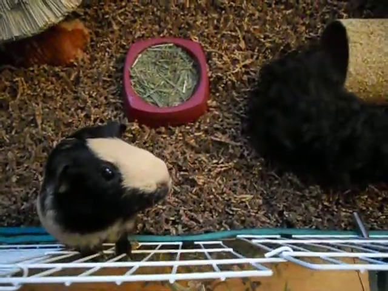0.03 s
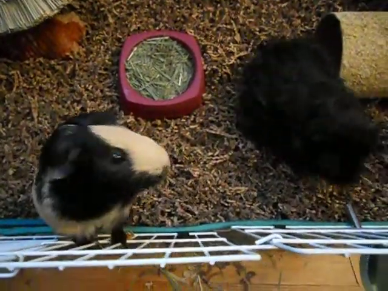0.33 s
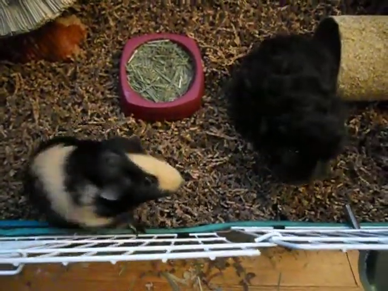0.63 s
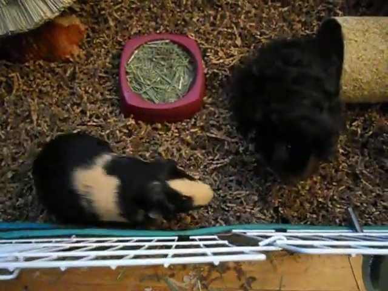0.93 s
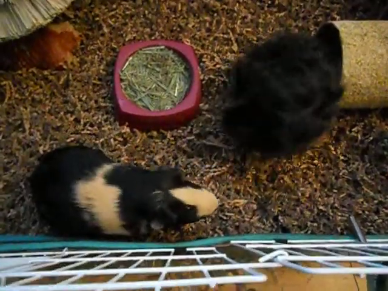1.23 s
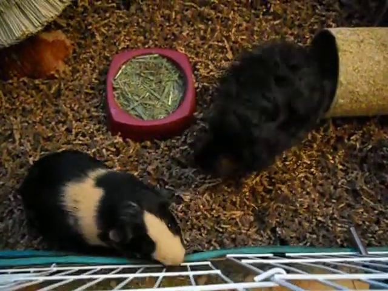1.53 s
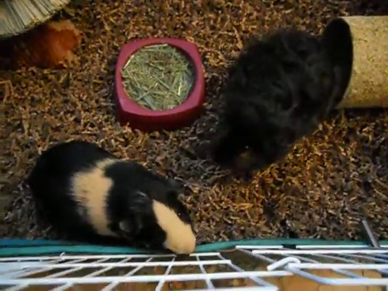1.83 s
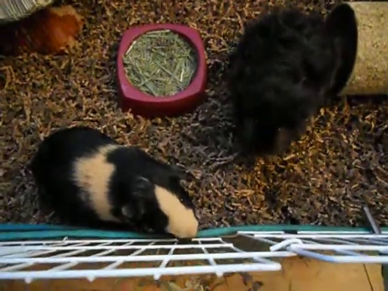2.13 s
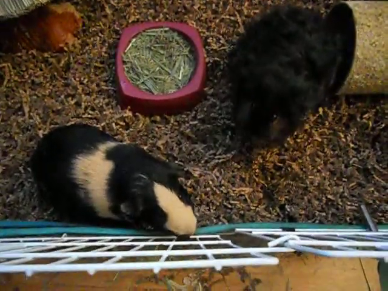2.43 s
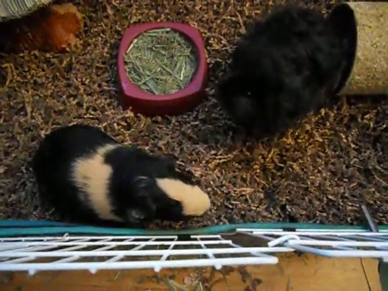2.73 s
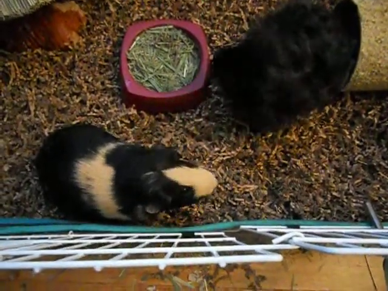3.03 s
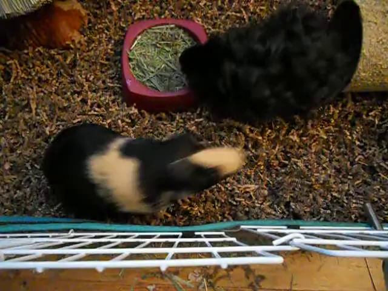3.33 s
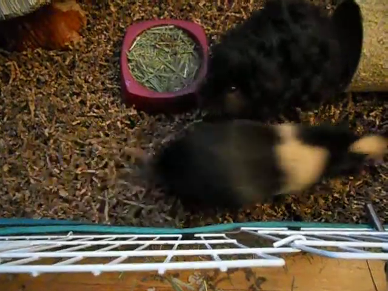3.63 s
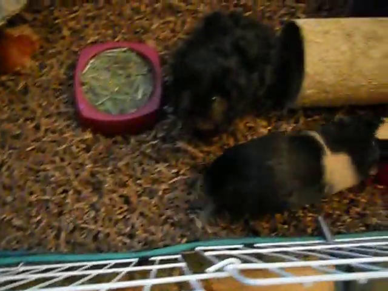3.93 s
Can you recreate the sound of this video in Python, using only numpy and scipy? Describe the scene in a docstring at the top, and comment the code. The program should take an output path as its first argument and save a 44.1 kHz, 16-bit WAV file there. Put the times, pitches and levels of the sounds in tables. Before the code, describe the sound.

Guinea pigs call close by over steady room hiss. Short rising clucks repeat from 0.2 to 2.9 seconds, with a soft whimper near 0.4 and light bedding rustles. Hoarse grunts come around 1.3, 2.5 and 2.9 seconds. Scattered hard ticks surround one sharp snap just before 3 seconds. From 3.2 to 4 seconds, two louder, wavering squeals climb in pitch as feet scuffle through dry, crackling bedding.

```python
"""Guinea pigs in an indoor cage

Heard from close above, they give short rising clucks, some sinking into a hoarse grunt, and end
on two wavering squeals, all from vocal folds sounding through the throat. Their feet shuffle through
dry, crackling bedding, with a few hard ticks and one sharp snap, over a steady room hiss."""
import sys
import numpy as np
from scipy import signal
from scipy.fft import rfft, irfft
from scipy.io import wavfile
from scipy.ndimage import uniform_filter1d

SR = 44100
rng = np.random.default_rng(int(sys.argv[2]) if len(sys.argv) > 2 else 0)


def bounce(signal):
    """Save signal as a 16-bit WAV file at the path given by the first command-line argument."""
    frames = np.transpose(np.atleast_2d(signal))
    limited = np.clip(frames, -1, 1)
    pcm = np.round(limited * 32767).astype(np.int16)
    wavfile.write(sys.argv[1], SR, pcm)


N = 176400
T = np.arange(N) / SR
HZ = np.fft.rfftfreq(N, 1 / SR)


def amp(db):
    """Decibels to gain."""
    return 10 ** (np.asarray(db) / 20)


def unit(x):
    """Scales to rms 1."""
    return x / np.sqrt(np.mean(x ** 2) + 1e-20)


def eq_db(points, hz):
    """Reads an EQ curve on a log-frequency axis."""
    f, db = np.transpose(points)
    return np.interp(np.log(hz + 1), np.log(f + 1), db)


def colour(x, points):
    """Plays x through an EQ curve, at rms 1."""
    return unit(irfft(rfft(x) * amp(eq_db(points, HZ)), N))


def wander(rate_hz):
    """Random drift up to a rate, at rms 1."""
    return unit(irfft(rfft(rng.standard_normal(N)) / (1 + (HZ / rate_hz) ** 4), N))


def add(mix, start, sound):
    """Mixes a sound in at a start in seconds."""
    part = mix[round(start * SR):][:len(sound)]
    part += sound[:len(part)]


# The colour of the room tone. Each row: frequency in Hz, relative level in dB.
ROOM_EQ = [(15, -38), (25, 2.5), (235, -5), (295, 0), (335, -2.5), (442, -3.5), (1040, -5), (2450, -9.5),
           (10300, -15), (13400, -37), (22000, -120)]
# Its fader. Each row: time in seconds, level in dB.
ROOM_FADER = [(0, -45.5), (.2, -46.5), (.8, -43), (2.1, -42.5), (4, -40)]

def room_tone():
    """A bed of hiss and rumble that creeps up a few dB."""
    return colour(rng.standard_normal(N), ROOM_EQ) * amp(np.interp(T, *np.transpose(ROOM_FADER)))


def room_reverb(x, wet_db=-10, t60_s=0.11):
    """The short, weak reverberation of a furnished room."""
    t = np.arange(SR // 2) / SR
    tail = rng.standard_normal(len(t)) * amp(-60 * t / t60_s) * (t > .003)
    return amp(wet_db) * signal.oaconvolve(x, tail / np.linalg.norm(tail))[:N]


HIT_T = np.arange(2048) / SR
CONTACT_S = 0.00026

def ring(modes, contact_s):
    """Dying sines of a struck object, built up over a brief contact."""
    sines = sum((-1) ** k * amp(db - 60 * HIT_T / t60) * np.sin(2 * np.pi * hz * HIT_T)
                for k, (hz, db, t60) in enumerate(modes))
    return np.minimum(HIT_T / contact_s, 1) * sines


# Feet pushing through the bedding. Each row: middle in seconds, half length in seconds, level in dB.
SCUFFS = [(0.39, 0.13, -48.5), (0.523, 0.024, -37.5), (0.584, 0.02, -35.5), (0.653, 0.03, -39),
          (0.859, 0.029, -38.5), (1.2, 0.11, -45), (1.377, 0.069, -40.5), (3.222, 0.12, -44),
          (3.364, 0.039, -34), (3.44, 0.015, -33), (3.518, 0.035, -32.5), (3.61, 0.027, -33.5),
          (3.763, 0.064, -34.5), (3.87, 0.032, -38), (3.966, 0.045, -43)]
# The dry colour of the flakes. Each row: frequency in Hz, relative level in dB.
BEDDING_EQ = [(100, -26), (400, -16.5), (1200, -9.5), (2500, -11.5), (4200, 3), (5500, -2), (8000, -2),
              (10300, -7), (12000, -16)]

def bedding(stir_db=-57.5, breaks_per_s=7500, spread_db=2.3, clump_db=2.5):
    """Over a faint stir, each scuff crushes dry flakes in clumps, crackling at a dozen pitches."""
    power = amp(stir_db) ** 2 + sum(amp(db) ** 2 * np.exp(-((T - middle) / half) ** 2)
                                    for middle, half, db in SCUFFS)
    flakes_hz = np.linspace(800, 12000, 12)
    crackle = np.zeros(N)
    for hz in flakes_hz:
        sizes = amp(spread_db * np.minimum(rng.exponential(1, N), 4.5)) * rng.choice([-1, 1], N)
        breaks = sizes * (rng.random(N) < breaks_per_s / len(flakes_hz) / SR)
        crackle += signal.oaconvolve(breaks, ring([(hz, 0, .0025)], CONTACT_S))[:N]
    clumps = amp(clump_db * wander(rate_hz=119))
    return np.sqrt(power) * colour(crackle * clumps, BEDDING_EQ)


def crack(t60_s=0.0074):
    """A very short, bright burst as something brittle gives way."""
    bright_noise = unit(np.diff(rng.standard_normal(len(HIT_T) + 1)))
    return bright_noise * np.minimum(HIT_T / CONTACT_S, 1) * amp(-60 * HIT_T / t60_s)


# Small hard ticks and a pop, each a crack and a short ring. Each row: start in seconds, level in dB,
# pitch in Hz, trim in dB on the upper modes and the crack.
TICKS = [(.668, -24.5, 4180, -5), (1.109, -21, 1580, -24), (2.4741, -17.5, 3650, -2.5),
         (2.655, -28.5, 3340, -9), (2.806, -15.5, 3970, -4.5), (2.822, -23.5, 3900, -14),
         (3.107, -26.5, 3640, -2), (3.2, -24, 4300, -11), (3.329, -13.5, 3800, -13), (3.367, -24, 4260, 0),
         (3.454, -32, 4050, 13)]
# The ring of a tick. Each row: pitch ratio, relative level in dB, time to fall 60 dB in seconds.
TICK_MODES = [(1, 1, 0.0076), (1.68, 1, 0.0045), (2.08, -1.5, 0.0058)]

def ticks():
    """Small hard ticks, probably claws and teeth, plus the pop of a cluck's abrupt start at 1.109 s."""
    out = np.zeros(N)
    for start, db, hz, upper_db in TICKS:
        modes = [(hz * ratio, mode_db + upper_db * (k > 0), t60)
                 for k, (ratio, mode_db, t60) in enumerate(TICK_MODES)]
        add(out, start, amp(db) * (ring(modes, 0.00042) + amp(upper_db) * crack()))
    return out


# The ring of the snap. Each row: frequency in Hz, gain in dB, time to fall 60 dB in seconds,
# build-up in seconds.
SNAP_MODES = [(1150, -9, 0.0025, .0004), (1820, -0.5, 0.0035, 0.00059), (2910, 4.5, 0.0084, 0.0027),
              (3810, 2.5, 0.01, 0.0032), (5110, -4.5, 0.0059, 0.0004), (7470, -14, 0.0078, 0.00072)]

def snap(start=2.9358):
    """One loud, brittle crack whose modes swell and die within milliseconds."""
    out = np.zeros(N)
    add(out, start, amp(-13.5) * crack())
    for hz, db, t60, build_s in SNAP_MODES:
        add(out, start, ring([(hz, db, t60)], build_s))
    return out


DRIFT_DEPTH, FLUTTER_DB, OVERTONE_DB_PER_OCT = .007, 2.3, -4
JITTER, SHIMMER, RASP = 0.092, .51, 0.57  # pitch shake, level shake and noise at roughness 1

def voice(start, hz, gain, rough, throat, unrest, tilt_db=0):
    """Vocal folds sound through the throat; rough ones beat unevenly and add a rasp."""
    samples = round(start * SR) + np.arange(len(hz))
    drift, jitter, shimmer, air, *flutter = np.take(unrest, samples, axis=1, mode="wrap")
    phase = 2 * np.pi * np.cumsum(hz * (1 + DRIFT_DEPTH * drift + JITTER * rough * jitter)) / SR
    k = 1 + np.arange(len(flutter))[:, None]  # harmonic numbers
    slope_db = (OVERTONE_DB_PER_OCT + tilt_db) * np.log2(k)
    partials = amp(eq_db(throat, k * hz) + slope_db + FLUTTER_DB * np.array(flutter))
    tone = (partials * np.cos(k * phase + k ** 2)).sum(0) / np.sqrt((partials ** 2).sum(0) / 2)
    shaky_tone = tone * (1 + SHIMMER * rough * shimmer)
    pulsed_air = air * (1 + .5 * np.cos(phase))
    rasp = np.clip(RASP * rough, 0, 1)
    return gain * (np.sqrt(1 - rasp ** 2) * shaky_tone + rasp * pulsed_air)


def follow(curve, fade_s=0.0059):
    """Smooths a call's curve into times, pitch, gain with soft ends, and timbre (its last column)."""
    times, *columns = np.transpose(curve)
    t = np.arange(times[0], times[-1], 1 / SR)
    hz, db, timbre = (uniform_filter1d(np.interp(t, times, c), size=200) for c in columns)
    fades = np.clip(np.minimum(t - times[0], times[-1] - t) / fade_s, 0, 1)
    return t, hz, amp(db) * fades, timbre


# Grunts, one curve each. Each row: time in seconds, pitch in Hz, level in dB, roughness (0 is clear).
GRUNTS = [
    [(1.218, 314.4, -38, 0.4), (1.25, 296.4, -39, 0.57), (1.272, 274, -34, 0.05), (1.305, 277, -37, 0.01),
     (1.328, 321.8, -31.5, 0.28), (1.352, 471, -37.5, 0.3), (1.373, 388, -31.5, .15),
     (1.393, 607, -30.5, 0.15)],
    [(2.478, 286, -44, 0.55), (2.52, 239.5, -37.5, .62), (2.565, 259.8, -39, 0.87),
     (2.6, 284.3, -34.5, 0.5), (2.627, 272, -38, .5)],
    [(2.858, 228.2, -41.5, .68), (2.925, 232.3, -39, 1.1), (2.952, 266, -35, 0), (2.98, 279.6, -36, 0.22),
     (3.019, 296.6, -30, .45)],
]
# Throat resonances in a grunt. Each row: frequency in Hz, relative level in dB.
GRUNT_THROAT = [(150, -22), (290, 0.5), (440, -7), (580, -0.5), (850, 7.5), (1120, 7.5), (1400, 4),
                (1650, -9), (2300, 1.5), (4500, -19)]

def grunts(unrest):
    """Low calls that pass between hoarse and clear."""
    out = np.zeros(N)
    for curve in GRUNTS:
        t, hz, gain, rough = follow(curve)
        add(out, t[0], voice(t[0], hz, gain, rough, GRUNT_THROAT, unrest))
    return out


# Clucks. Each row: start in seconds, length in seconds, starting pitch in Hz, rise in octaves,
# level in dB, closing flick in octaves, roughness, brightness in dB per octave.
CLUCKS = [(0.191, 0.078, 494.5, 0.096, -43.5, 0.11, 0.3, -1.5),
          (.616, 0.13, 509.5, .2, -34, 0.85, 0.34, 2.5), (0.848, .125, 508, .26, -34, 0.59, 0.09, -0.5),
          (1.045, 0.025, 790, 0.66, -37, .3, 0, -4), (1.103, 0.14, 491, 0.23, -35, 0, 0.29, 1),
          (1.525, 0.1, 452, 0.36, -35.5, 0.24, 0.31, 2), (1.839, .075, 445, 0.187, -37, 0.17, 0.18, 1.5),
          (2.41, 0.087, 451, 0.14, -38, 0.47, 0.42, 0), (2.785, 0.074, 439, 0.13, -38, 0.029, 0.46, 0.5)]
# Throat resonances in a cluck or whimper. Each row: frequency in Hz, relative level in dB.
CLUCK_THROAT = [(250, -20), (500, 5.5), (660, -0.5), (980, 2.5), (1140, 9.5), (1400, 3), (1680, 1),
                (1950, -8.5), (2300, -3.5), (2850, -6.5), (3600, -15), (6000, -33)]

def clucks(unrest, flick_s=0.026, attack_s=0.016, release_s=0.0099):
    """Short notes that climb steadily; most flick up and turn purer as they stop."""
    out = np.zeros(N)
    for start, length, hz, rise, db, flick, rough, bright_db in CLUCKS:
        t = np.arange(0, length, 1 / SR)
        leap = flick * np.clip(1 - (length - t) / flick_s, 0, 1)
        octaves = rise * (t / length) ** 1.184 + leap
        gain = amp(db) * np.minimum(t / attack_s, 1) * np.minimum((length - t) / release_s, 1)
        tilt_db = bright_db - 11 * leap
        add(out, start, voice(start, hz * 2 ** octaves, gain, rough, CLUCK_THROAT, unrest, tilt_db))
    return out


TREMOR_HZ, TREMOR_DEPTH, TREMOR_DB, TREMOR_ONSET_HZ = 40, .032, 2.5, (950, 1150)

def high_call(curve, throat, unrest, base_rough, max_rough=0.66):
    """A drawn-out voice that roughens as it glides and trembles if it climbs high enough."""
    t, hz, gain, bright_db = follow(curve)
    octaves_per_s = abs(np.gradient(np.log2(hz))) * SR
    rough = np.minimum(base_rough + 0.0055 * octaves_per_s, max_rough)
    strain = np.interp(hz, TREMOR_ONSET_HZ, (0, 1))
    tremor = strain * np.sin(2 * np.pi * TREMOR_HZ * (t - t[0]))
    wavering_hz = hz * (1 + TREMOR_DEPTH * tremor)
    return voice(t[0], wavering_hz, gain * amp(TREMOR_DB * tremor), rough, throat, unrest, bright_db)


# The whimper and the squeals, one curve each.
# Each row: time in seconds, pitch in Hz, level in dB, brightness in dB per octave.
WHIMPER = [(.257, 525, -45, 0), (.284, 640, -38, -7.5), (.305, 469, -44.5, -1), (0.341, 435, -41.5, 2.5),
           (.38, 596.5, -36, -9.5), (0.402, 523, -39, 2), (.428, 607.6, -36.5, -11),
           (.448, 473.6, -38, 3.5), (.488, 533, -40.5, 0), (.511, 770, -32, -8)]
SQUEALS = [
    [(3.165, 441.7, -40, -2), (3.248, 538, -31.5, -1.5), (3.266, 1039, -37.5, -2), (3.285, 950, -32.5, -4),
     (3.308, 1102, -26.5, -4), (3.319, 748, -34.5, 3), (3.335, 647, -29.5, -1), (3.362, 917, -31, -4.5),
     (3.385, 878, -30.5, -3), (3.403, 736, -28.5, 1), (3.432, 748, -26.5, -3), (3.446, 682, -32, 0.5),
     (3.505, 687, -31, 8), (3.527, 762, -38, -9), (3.544, 1073, -28, 4), (3.572, 915, -36.5, -6)],
    [(3.657, 517, -32.5, -2), (3.712, 507, -36, -1), (3.755, 576.4, -32.5, 5.5), (3.778, 717, -34, -1),
     (3.79, 979, -27, -11), (3.806, 1014, -34, -5), (3.82, 1176, -31, 2), (3.846, 1053, -42, 0),
     (3.86, 1289, -31.5, 8), (3.878, 1312, -29, 3), (3.91, 1144, -31, -2), (3.942, 1130, -30, -8),
     (3.958, 1208, -31, 1), (4.005, 1140, -28.5, 0)],
]
# Throat resonances in a squeal. Each row: frequency in Hz, relative level in dB.
SQUEAL_THROAT = [(510, -0.5), (700, -5), (880, -10.5), (1020, 2.5), (1200, 2), (1450, 5.5), (1800, -4.5),
                 (2060, -0.5), (2280, -8.5), (2700, -6.5), (3000, 0), (3600, -18), (6000, -36)]

def whimper_and_squeals(unrest):
    """One soft, husky whimper early on and two louder, higher squeals to finish."""
    out = np.zeros(N)
    add(out, WHIMPER[0][0], high_call(WHIMPER, CLUCK_THROAT, unrest, base_rough=0.29))
    for curve in SQUEALS:
        add(out, curve[0][0], high_call(curve, SQUEAL_THROAT, unrest, base_rough=0.082))
    return out


def guinea_pigs():
    """All the calls, sharing the breath noise and random unrest that keep a voice alive."""
    throat_noise = colour(rng.standard_normal(N), GRUNT_THROAT)
    air = colour(throat_noise, [(500, 0.5), (3000, -26.5)])  # darkened above 500 Hz
    drift, jitter, shimmer = wander(70), wander(198), wander(300)
    flutter = [wander(50) for _ in range(12)]  # one for each harmonic
    unrest = np.array([drift, jitter, shimmer, air] + flutter)
    return grunts(unrest) + clucks(unrest) + whimper_and_squeals(unrest)


def scene():
    """Animals and bedding over the room tone, in mono; the clicks stay nearly dry."""
    near = guinea_pigs() + bedding()
    clicks = ticks() + snap()
    return (near + clicks + room_tone() + room_reverb(near + amp(-15) * clicks))[None]


def record(dry):
    """A small camera microphone: the top treble steps down, then stops."""
    shelf_hz, shelf_db, cutoff_hz = 10600, -9.5, 12400
    shelf = amp(shelf_db * np.clip((HZ - shelf_hz) / 400 + .5, 0, 1))
    dulled = irfft(rfft(dry) * shelf, N)
    lowpass = signal.firwin(255, cutoff_hz, window=("kaiser", 9), fs=SR)
    return signal.oaconvolve(dulled, lowpass[None], "same")


dry = scene()
out = record(dry)
bounce(out)
```